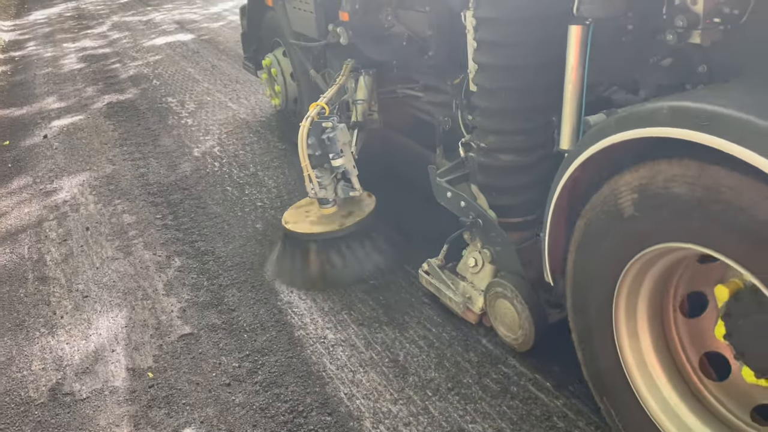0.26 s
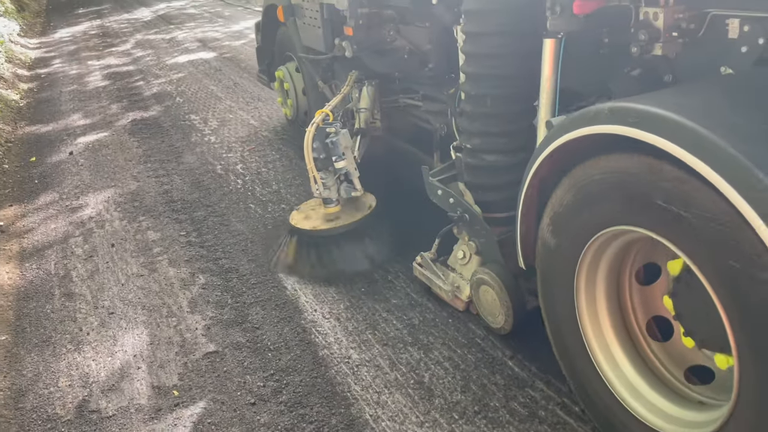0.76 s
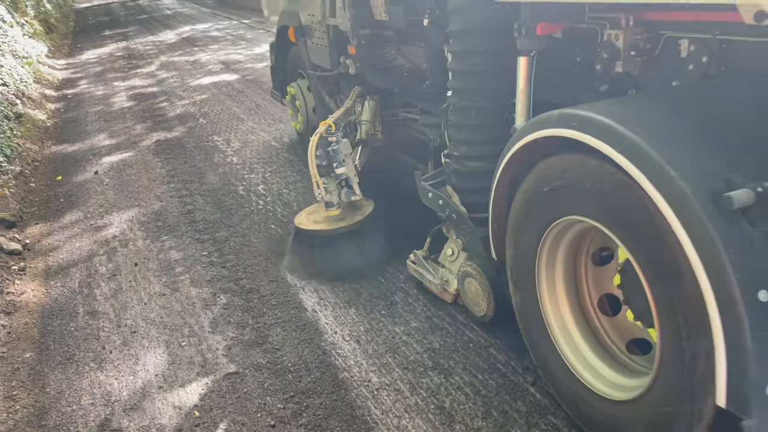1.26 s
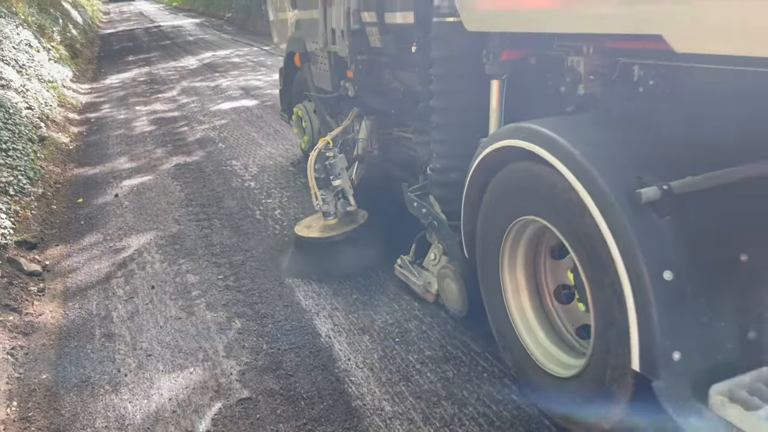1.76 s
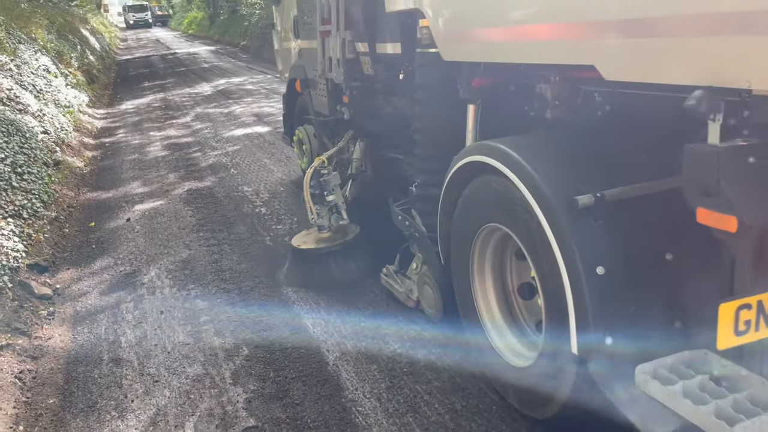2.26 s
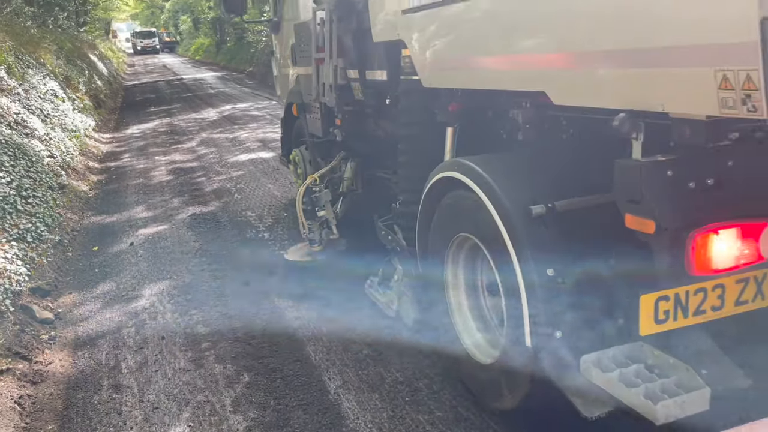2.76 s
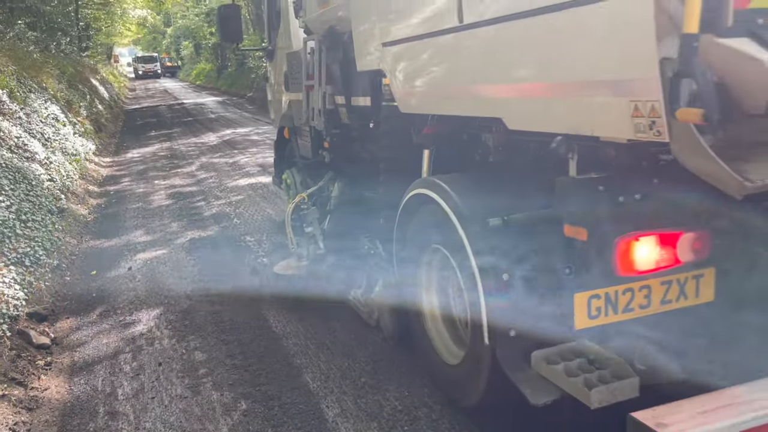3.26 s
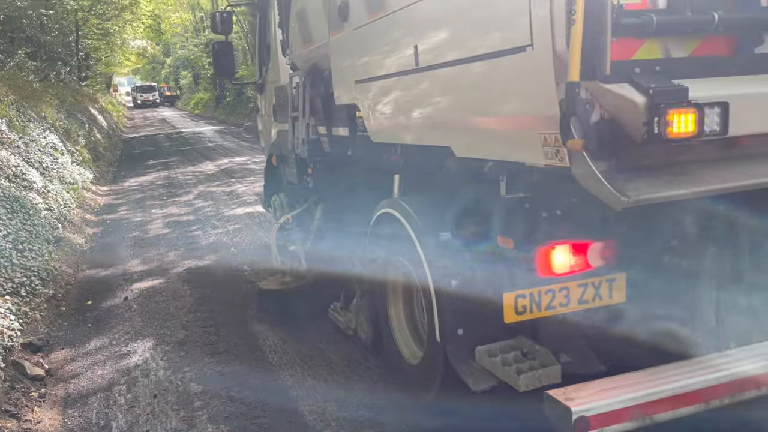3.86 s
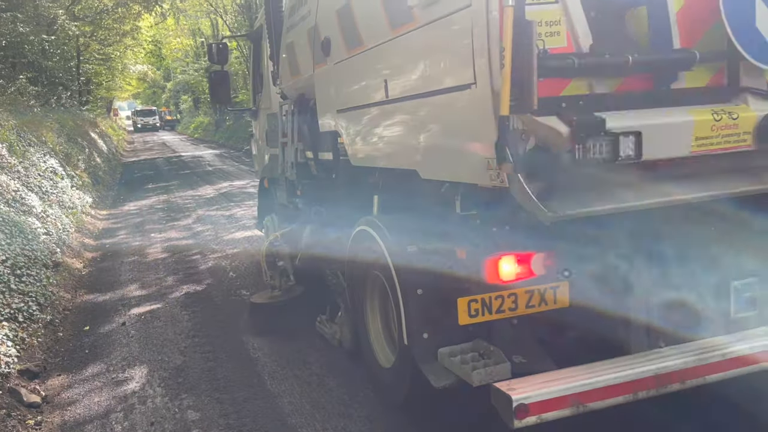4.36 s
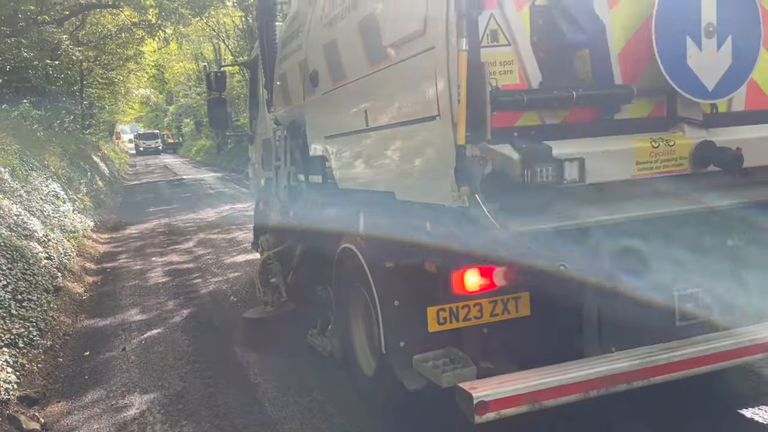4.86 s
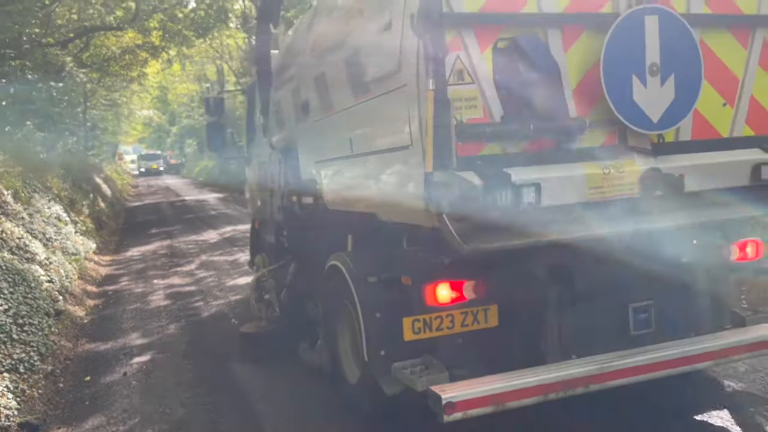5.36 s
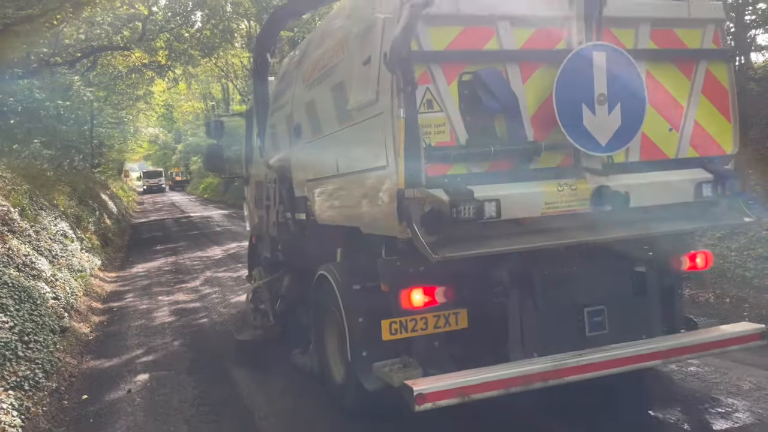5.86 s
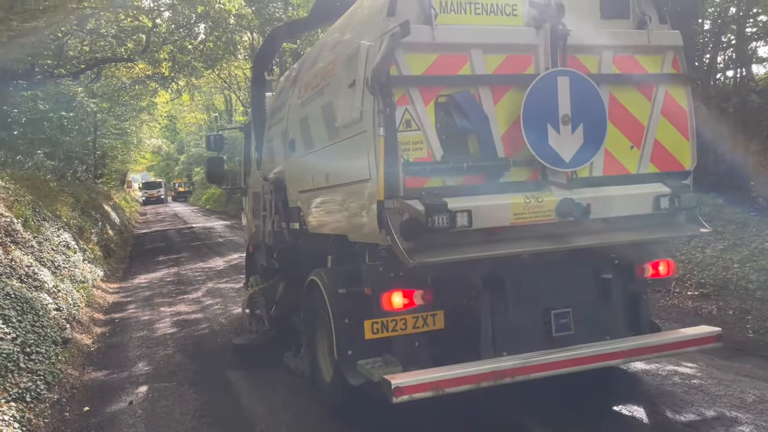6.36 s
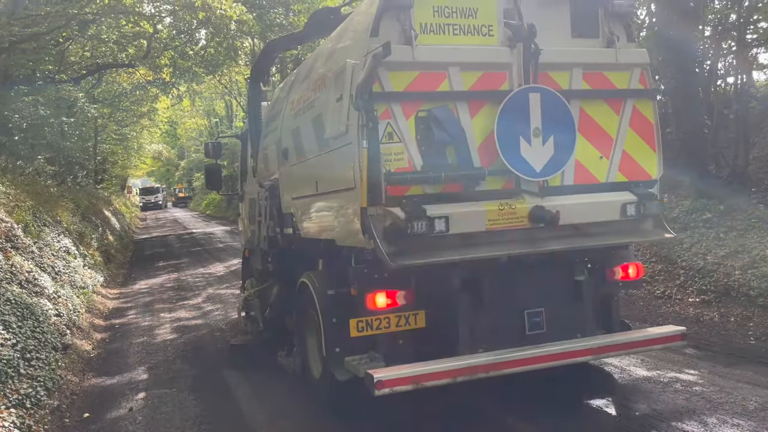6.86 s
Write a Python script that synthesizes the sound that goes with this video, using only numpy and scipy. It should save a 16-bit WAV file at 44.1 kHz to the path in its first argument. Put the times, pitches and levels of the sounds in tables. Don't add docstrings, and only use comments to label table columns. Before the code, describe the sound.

A road sweeper truck works right beside a handheld stereo microphone outdoors on a lane. Broad suction roar and bright brush hiss start at once and never stop, over a low steady engine hum and a wavering mid-pitched fan whine. Tiny high squeaks come from the bristles around two seconds. As it crawls ahead, the sound darkens a little, low hollow booms grow, and wind rumbles on the microphone near the end.

```python
import sys
import numpy as np
from scipy import signal
from scipy.fft import rfft, irfft
from scipy.io import wavfile
from scipy.ndimage import uniform_filter1d

SR = 44100
rng = np.random.default_rng(int(sys.argv[2]) if len(sys.argv) > 2 else 0)


def put_to_file(sound):
    columns = np.atleast_2d(sound).T
    safe = np.clip(columns, -1, 1)
    whole_steps = np.round(safe * 32767)
    wavfile.write(sys.argv[1], SR, whole_steps.astype(np.int16))


def voltage_ratio(decibels):
    exponent = np.asarray(decibels, float) / 20
    return 10 ** exponent


N = 313110

# start_s, tail_turned_0_to_1, suction_effort_db
TRUCK_PATH = [(0, .08, 0.5), (1, 0.14, 1), (1.5, 0.03, -.5), (2.5, 0.15, -1), (3.5, 0.5, -1),
              (4.2, 0.73, -1), (5.6, 0.78, -0.5), (6.5, 0.8, -1), (7.1, 0.82, .5)]
SPACED_HZ = 6850


def evened(x):
    return x / np.sqrt(np.mean(abs(x) ** 2) + 1e-20)


def along(rows, t):
    s, *columns = np.transpose(rows)
    return [np.interp(t, s, c) for c in columns]


def across(rows, hz):
    f, *columns = np.transpose(rows)
    return [np.interp(np.log(hz + 1), np.log(f), c)[:, None] for c in columns]


def drift(count, rate):
    pole = np.exp(-rate)
    two_poles = np.convolve([1, -pole], [1, -pole])
    settle = 2000
    return evened(signal.lfilter([1], two_poles, rng.standard_normal(count + settle))[settle:])


def glide(rate):
    count = N // 16 + 2
    return np.interp(np.arange(N) / 16, np.arange(count), drift(count, 16 * rate))


def fuzzy_tone(hz, width_hz, steady):
    step = np.pi * width_hz / SR
    wander = glide(step) + 1j * glide(step)
    wander = evened(wander / abs(wander) ** np.clip(steady, 0, 1))
    return np.sqrt(2) * wander * np.exp(2j * np.pi * np.cumsum(hz * np.ones(N)) / SR)


def placed(tone, lean_db, lead_rad=0.):
    left = tone * voltage_ratio(lean_db / 2)
    right = tone * voltage_ratio(-lean_db / 2) * np.exp(1j * lead_rad)
    return np.array([left.real, right.real])


def swells(rows, t, rise=1):
    return np.sqrt(sum(voltage_ratio(db - fade_db * np.maximum(t - s, rise * (s - t))) ** 2
                       for s, db, fade_db in rows))


def spaced(hz):
    opposed_hz, half_turn_hz = 8200, 3400
    linger_half, linger_whole = .37, .29
    like_between, like_locked = .58, .915
    turn = np.pi * (1 + np.minimum((hz - opposed_hz) / half_turn_hz, 2))
    lead = turn - linger_half * np.sin(2 * turn) - linger_whole * np.sin(turn)
    lead = lead - .6 * np.exp(-abs(hz - SPACED_HZ) / 400)
    return like_between + (like_locked - like_between) * np.cos(lead) ** 8, lead


def wind(t):
    # freq_hz, level_db_per_hz
    wind_colour = [(22, -32), (40, -8), (65, 0), (130, -4), (250, -12), (450, -28)]
    # top_s, level_db, fade_db_per_s
    gusts = [
        (4.85, -43, 20),
        (5.9, -35, 30),
        (6.3, -34, 12),
        (6.97, -34, 14),
    ]
    calm_s = 4.4
    hz = np.fft.rfftfreq(N, 1 / SR)
    colour = voltage_ratio(across(wind_colour, hz)[0][:, 0]) * (hz < 900)
    lumps = voltage_ratio(5.5 * np.array([glide(200 / SR), glide(200 / SR)]))
    air = evened(irfft(rfft(rng.standard_normal((2, N)) * lumps) * colour, N))
    air = air - .75 * air[::-1]
    rise = np.clip((t - calm_s) / .3, 0, 1)
    return air * rise * swells(gusts, t) * voltage_ratio(np.array([[1.5], [.5]]))


def squeaks(t):
    # start_s, length_s, start_hz, end_hz, level_db
    whistles = [(1.89, .085, 6275, 6280, -46), (2, .13, 6270, 6270, -45), (2.13, .06, 6270, 6270, -45),
                (2.2, .09, 6265, 6250, -48), (2.29, .15, 6140, 6155, -47), (2.49, .13, 6100, 6065, -48),
                (4.06, .12, 6280, 6280, -46), (4.16, .1, 6280, 6270, -50), (5.76, .12, 6280, 6290, -51),
                (6.23, .16, 6270, 6290, -49), (6.44, .09, 6200, 6230, -49), (6.57, .08, 6290, 6290, -52)]
    hz, height = np.full(N, whistles[0][2], float), np.zeros(N)
    for start_s, length_s, start_hz, end_hz, db in whistles:
        part = (t >= start_s) & (t < start_s + length_s)
        hz[part] = np.linspace(start_hz, end_hz, part.sum())
        height[part] = voltage_ratio(db + 3) * signal.windows.tukey(part.sum(), .3)
    return placed(height * fuzzy_tone(hz, 8, 1), .8)


def engine(t):
    # top_s, level_db, fade_db_per_s
    surges = [(1.65, -23, 60), (1.99, -33, 52), (2.72, -23.5, 78), (4.1, -26, 60), (4.72, -20.5, 120),
              (5.33, -22.5, 60), (5.78, -22, 150), (6.1, -18, 200), (6.7, -16.5, 97), (6.9, -16.5, 200),
              (7.0, -19, 80)]
    away = along(TRUCK_PATH, t)[0]
    firing_db = -32.5 - 0.3 * t + 0.2 * glide(12 / SR)
    firing = placed(voltage_ratio(firing_db) * fuzzy_tone(66.6, .6, .9), .5, .3)
    boom_hz = 194.3 + 1.9 * t
    boom = voltage_ratio(-29.5 + 4.95 * away) * fuzzy_tone(boom_hz, 63, 0.12)
    boom = boom + swells(surges, t, 4.) * fuzzy_tone(boom_hz, 24.4, 0.8)
    return firing + placed(boom, .3 + 3.6 * away, .25)


def fan(t):
    # top_s, level_db, fade_db_per_s
    blade_lobes = [
        [(0.05, -26, 19.5), (.8, -37.5, 15), (3.3, -38, 21), (4.3, -38, 2), (5.97, -33, 29), (7.1, -36, 21)],
        [(0, -38.5, 14), (1.35, -38, 21), (2, -33, 23), (2.55, -34.5, 23), (2.85, -37, 23), (4.58, -41, 25),
         (5.3, -40.5, 24), (6.5, -36, 12)],
        [(.5, -44, 18), (1.4, -42, 30), (2.7, -48, 10), (3.5, -48, 10), (6, -50, 15), (7.1, -49, 20)],
        [(.3, -49, 12), (2.55, -54, 8), (5.8, -53, 14)],
    ]
    # freq_hz, width_hz, top_level_db, top_s, fade_db_per_s
    whines = [(417.4, 2, -34.5, 3.24, 2.9), (654, 12, -47.5, 1.8, 0.5), (1118, 4.3, -43, 1.1, 8),
              (379.4, 35, -34.5, 2.8, 2), (539.3, 34, -37, 3.6, 7), (2470, 270, -42.5, 1.9, 2.5),
              (381, 36, -29.5, 0.99, 15), (393, 29, -31.5, 1.94, 14), (82, 7.5, -29, 0.84, 58)]
    blade_hz, blade_width_hz, blade_lead_rad = 463.7, 1.4, 0.4
    out = np.zeros((2, N))
    for k, lobes in enumerate(blade_lobes, 1):
        flutter_db = 2.2 * glide(50 / SR)
        tone = swells(lobes, t) * voltage_ratio(flutter_db) * fuzzy_tone(k * blade_hz, blade_width_hz, 0.87)
        out += placed(tone, 1.4 + 1.6 * glide(5 / SR), blade_lead_rad / k ** 2)
    for centre_hz, width_hz, top_db, top_s, fade_db in whines:
        height = voltage_ratio(top_db - fade_db * abs(t - top_s))
        out += placed(height * fuzzy_tone(centre_hz, width_hz, 0.24), 0.7)
    return out


def rush():
    # freq_hz, beside_db_per_hz, behind_db_per_hz
    roar_colour = [(22, -75, -77), (40.2, -79, -77), (55, -51, -43), (87.5, -47.5, -56), (109, -50, -51),
                   (123, -47, -45.5), (165, -52, -51), (270, -48, -54.5), (401, -52, -51.5),
                   (445, -62, -57.5), (526, -50, -59.5), (732, -57, -63.5), (1150, -58.5, -61),
                   (1470, -59.5, -70)]
    # freq_hz, beside_db_per_hz, behind_db_per_hz
    hiss_colour = [(1200, -70, -64.5), (1690, -64.5, -68.5), (2540, -66, -70), (2680, -68, -68.5),
                   (2900, -63.5, -68), (4720, -66.5, -67.5), (6400, -68.5, -73.5), (6600, -70, -69.5),
                   (8660, -64.5, -69.5), (11280, -69.5, -73.5), (12500, -74, -78), (13700, -72, -76.5),
                   (15800, -71.5, -73)]
    # freq_hz, likeness_beside, likeness_behind, right_lead_beside_rad,
    # right_lead_behind_rad, left_over_right_beside_db, left_over_right_behind_db
    port_pair = [(60, 1, 1, 0.29, -0.07, 0, -1), (500, 0.88, .9, -0.15, -0.36, -1.5, 6),
                 (1170, 1, 0.94, -0.85, -0.35, 4, 3), (1730, 0.47, 0.45, 1, .4, 5.5, 7),
                 (2400, 0.65, 0.98, -0.084, -0.43, 9.5, 6.5), (3050, 1, 0.68, -.3, -.2, 5.5, 5),
                 (3260, 0.93, 0.91, 0.27, 0, 4, 2.5), (4560, 1, 0.76, 0, 0, 5, 9),
                 (5500, 0.94, 0.55, 0, -0.2, 0.5, 7.5), (6800, .975, 0.49, -0.26, 1.6, 4, -3)]
    patchy_db, swish_db, flicker_db = 1., .12, .35
    brush_hz, crossover_hz = 3.1, 1350
    near_brush_db, brush_leaves_s = 1.5, 0.58
    frames, hz = N // 512 + 6, np.fft.rfftfreq(2048, 1 / SR)
    t = np.arange(frames) * 512 / SR
    away, roar_db = along(TRUCK_PATH, t)
    hiss_db = roar_db + near_brush_db * np.exp(-t / brush_leaves_s) - .4

    def blend(beside, behind, late=1):
        return beside + (behind - beside) * np.clip(away, 0, 1) ** late

    a, b, c, d, patches = rng.standard_normal((frames, len(hz), 5)).T
    patches = uniform_filter1d(uniform_filter1d(patches, size=14, axis=0), size=8, axis=1)
    patches = evened(patches)
    hz_rows = hz[:, None]

    swish = swish_db * np.sin(2 * np.pi * brush_hz * t + drift(frames, 0.14))
    swish = swish + flicker_db * drift(frames, 2.1)
    treble = 1 / (1 + (crossover_hz / (hz_rows + 1)) ** 12)
    bass_db = blend(*across(roar_colour, hz)) + roar_db
    treble_db = blend(*across(hiss_colour, hz)) + hiss_db + swish
    level_db = (1 - treble) * bass_db + treble * treble_db

    echo_s = blend(1.28e-3, 1.2e-3)
    reach = np.exp(-(np.log(hz_rows / 3100 + 1e-9) / 0.21) ** 2)
    level_db = level_db + 0.57 * reach * np.cos(2 * np.pi * hz_rows * echo_s)

    columns = [column[:, None] for column in along(port_pair, hz)]
    same = blend(columns[0], columns[1], 1.5)
    lead = blend(columns[2], columns[3])
    lean_db = blend(columns[4], columns[5])
    high = hz_rows > SPACED_HZ
    high_same, high_lead = spaced(hz_rows)
    same = np.clip(np.where(high, high_same, same), 0, 1)
    lead = np.where(high, high_lead, lead)
    lean_db = np.where(high, 0, lean_db)

    left = a + 1j * b
    right = same * left * np.exp(1j * lead) + np.sqrt(1 - same ** 2) * (c + 1j * d)
    pair = np.array([left * voltage_ratio(lean_db / 2), right * voltage_ratio(-lean_db / 2)])
    pair = pair / np.sqrt(np.cosh(np.log(voltage_ratio(lean_db))))
    spectra = pair * voltage_ratio(level_db + patchy_db * patches)
    return voltage_ratio(14.5) * signal.istft(spectra, nperseg=2048, noverlap=1536)[1][:, :N]


def scene():
    t = np.arange(N) / SR
    return rush() + engine(t) + fan(t) + squeaks(t) + wind(t)


def top_cut(x):
    return signal.sosfilt(signal.butter(12, 15800, fs=SR, output="sos"), x)


def record(dry):
    # time_s, from_hz, to_hz
    full_blocks = [(.44, 7000, 9500), (1.44, 10000, 13000), (2.5, 10000, 13000), (4.54, 7000, 9500),
                   (4.57, 7000, 9500), (6.94, 7000, 9500), (5.33, 15500, 15800), (5.75, 15500, 15800)]
    spare_db, low_spare_db, split_hz = 6., 13.2, 6850
    dry = signal.sosfilt(signal.butter(2, 34, "high", fs=SR, output="sos"), dry)
    sum_diff = np.array([dry[0] + dry[1], dry[0] - dry[1]]) / 2
    hz, t, z = signal.stft(sum_diff, SR, nperseg=2048, noverlap=1024)
    edges = np.arange(0, len(hz), 8)
    band_hz = hz[edges]
    high = (band_hz > split_hz)[:, None]
    low = (band_hz < split_hz)[:, None]
    power = np.add.reduceat(abs(z) ** 2, edges, axis=1) + 1e-20
    margin_db = np.where(high, spare_db, low_spare_db + 1.8 * drift(len(t), .9))

    over_blocks = uniform_filter1d(power, size=2, axis=2)
    over_bands = uniform_filter1d(power * low, size=5, axis=1)
    settled = np.where(high, over_blocks, over_bands)
    weak = (settled * voltage_ratio(2 * margin_db) < settled[::-1]) & (band_hz > split_hz / 2)[:, None]
    for s, from_hz, to_hz in full_blocks:
        weak[:, (band_hz > from_hz) & (band_hz < to_hz), np.argmin(abs(t - s))] = False

    band = np.arange(len(hz)) // 8
    kept = np.where(weak, 0, np.where(weak[::-1], np.sqrt(power.sum(0) / power), 1))
    mid, side = signal.istft(z * kept[:, band], SR, nperseg=2048, noverlap=1024)[1][:, :N]
    return top_cut(np.array([mid + side, mid - side]))


dry = scene()
out = record(dry)
put_to_file(out)
```